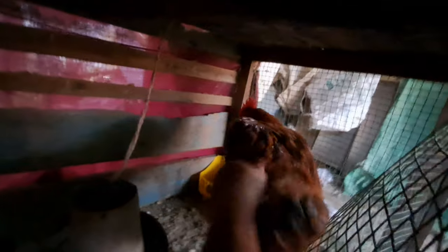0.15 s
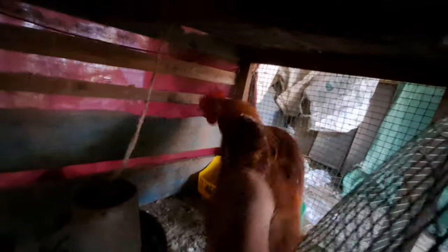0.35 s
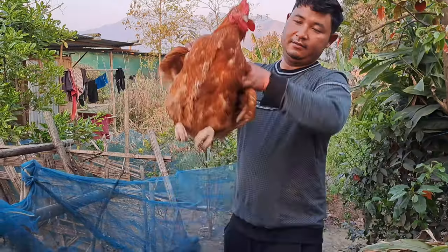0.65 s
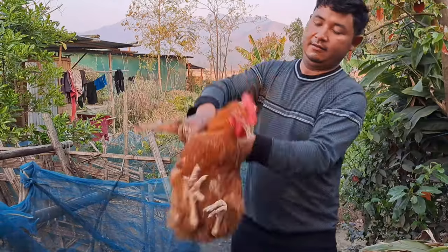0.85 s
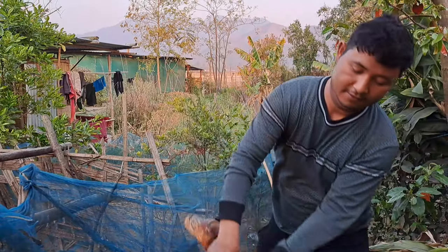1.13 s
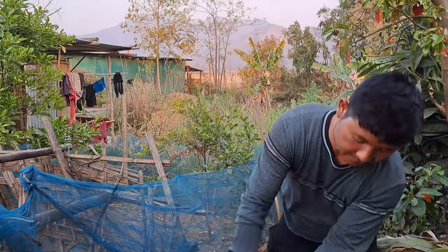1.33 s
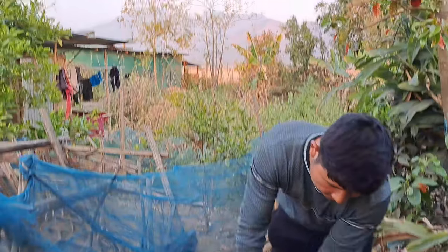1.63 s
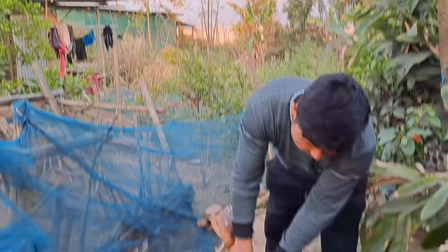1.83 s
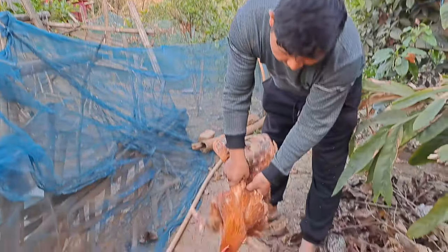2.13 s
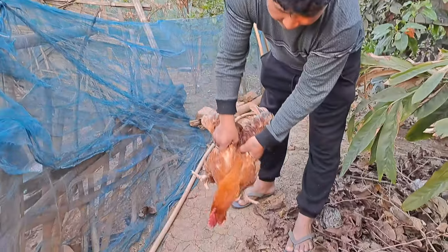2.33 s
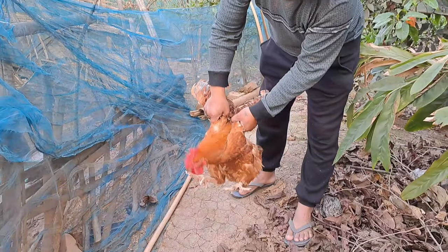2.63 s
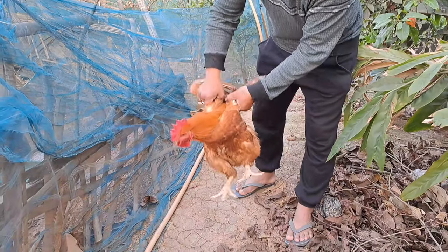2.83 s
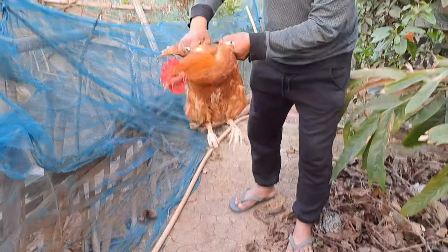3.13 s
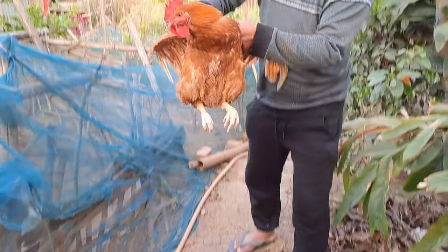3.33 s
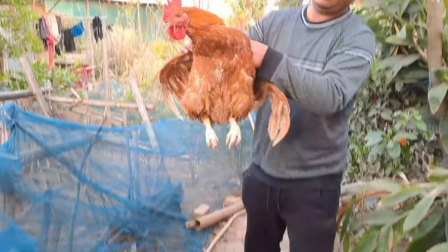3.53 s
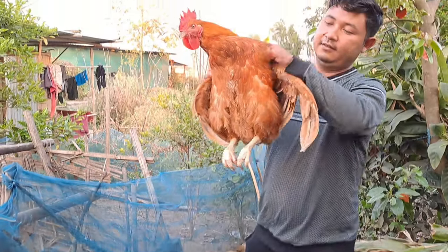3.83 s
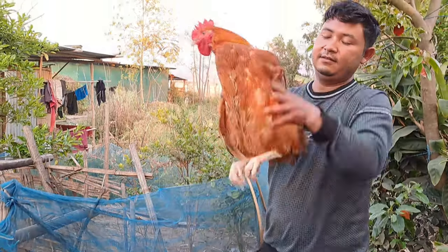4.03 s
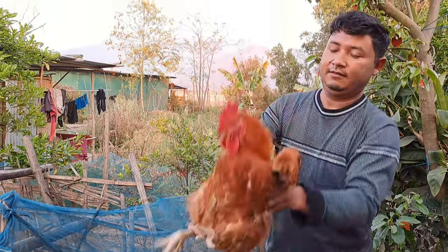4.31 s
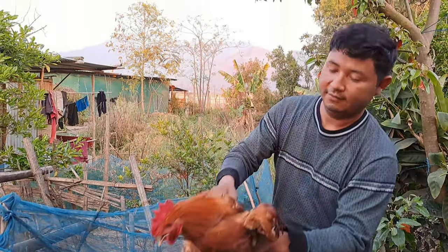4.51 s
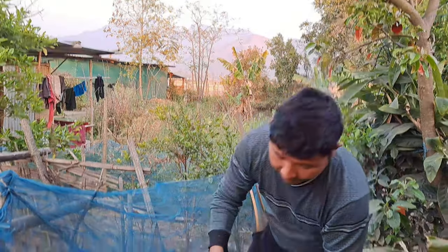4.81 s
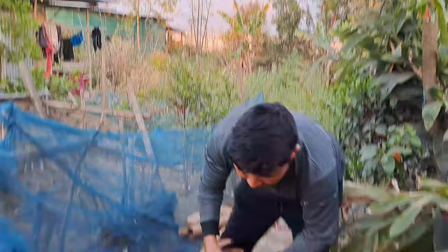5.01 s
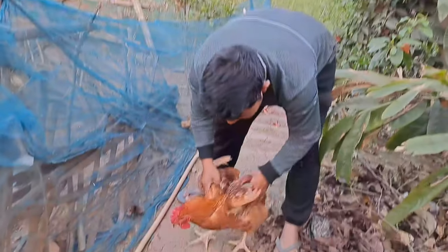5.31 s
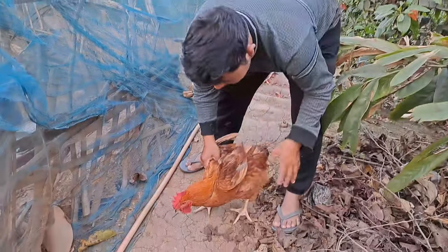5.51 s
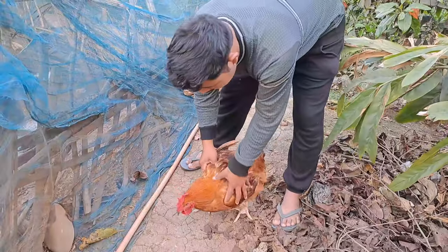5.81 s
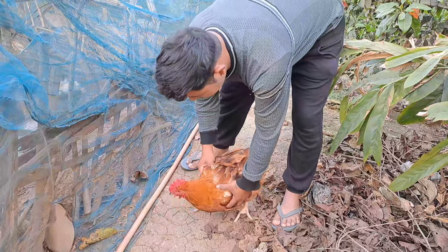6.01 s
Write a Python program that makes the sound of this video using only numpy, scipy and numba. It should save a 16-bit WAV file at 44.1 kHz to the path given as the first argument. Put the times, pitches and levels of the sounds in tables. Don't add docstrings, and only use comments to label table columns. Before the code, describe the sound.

Close stereo pickup of a frightened hen. Inside a dry wooden coop she gives rapid low clucks while feathers and straw rustle and wings thump boards. A tiny silent gap, then open garden air: a harsh raspy scream, low clucks, soft peeps, barks and loud squawks. Dry twigs crack sharply near the end, with a distant engine throbbing quietly underneath.

```python
import sys
import numpy as np
from scipy import signal
from scipy.fft import rfft, irfft
from scipy.io import wavfile
from scipy.ndimage import uniform_filter1d, minimum_filter1d, map_coordinates
from numba import njit

SR = 44100
rng = np.random.default_rng(int(sys.argv[2]) if len(sys.argv) > 2 else 0)


def gain_from_db(level_db):
    decades = np.asarray(level_db, float) / 20
    return 10 ** decades


def store_pcm(level_fs):
    pcm = np.round(np.clip(level_fs, -1, 1) * 32767).astype(np.int16)
    wavfile.write(sys.argv[1], SR, np.atleast_2d(pcm).T)


N = 271744
TIME = np.arange(N) / SR
SIDES = np.array([[1], [-1]])
# start_s, end_s
CHANGE_S = (.679, .708)


def level(x, db):
    return x * gain_from_db(db) / np.sqrt(np.mean(x ** 2))


def steady(x, span_s):
    return x / np.sqrt(uniform_filter1d(x ** 2, int(span_s * SR)) + 1e-12)


@njit
def svf(x, g, k):
    y, b, l = np.empty(len(x)), 0., 0.
    for i in range(len(x)):
        v = (b + g[i] * (x[i] - l)) / (1 + g[i] * (g[i] + k[i]))
        b, l, y[i] = 2 * v - b, l + 2 * g[i] * v, k[i] * v
    return y


def band(x, hz, width_hz, count=1):
    g = np.tan(np.pi * hz / SR) + np.zeros(N)
    k = width_hz / hz + np.zeros(N)
    for _ in range(count):
        x = svf(x, g, k)
    return x


def walk(rate_hz):
    hold = int(SR / rate_hz)
    steps = np.repeat(rng.standard_normal(N // hold + 1), hold)
    return 1.3 * uniform_filter1d(uniform_filter1d(steps, hold), hold)[:N]


def curves(tables):
    s, *columns = np.vstack(tables).T
    s = np.maximum.accumulate(s)
    gate = sum((TIME > t[0][0]) & (TIME < t[-1][0]) for t in tables)
    return uniform_filter1d(np.minimum(gate, 1.), size=200), [np.interp(TIME, s, c) for c in columns]


def air():
    # hz, density_db
    spectrum = [(82, -32), (140, -14), (192, -20), (316, -3.5), (670, -13), (977, -9), (3090, -38),
                (4240, -23), (12100, -51.5), (16000, -47)]
    # time_s, level_db
    swell = [(0, -7.5), (.7, 2), (2.5, -3.5), (4.5, -4.5), (5.6, -8.5), (6.16, -9.5)]
    log_hz, density_db = np.log(np.array(spectrum)[:, 0]), np.array(spectrum)[:, 1]
    out = 0
    for hz in 160 * 2 ** np.arange(0, 6.7, .5):
        mid, side = (band(rng.standard_normal(N), hz, hz / 3) for _ in range(2))
        db = np.interp(np.log(hz), log_hz, density_db) + 2 * walk(7.1)
        out = out + gain_from_db(db) * (mid + min(hz / 1000.0, 1) * side * SIDES)
    return level(out, -54.5) * gain_from_db(np.interp(TIME, *np.transpose(swell)))


def pump():
    # time_s, level_db
    loudness = [(0.0, -54.5), (0.45, -52), (4.01, -43), (6.16, -55.5)]
    turn = 2 * np.pi * np.cumsum(57.5 + 1.2 * walk(6)) / SR
    firing = gain_from_db(2.5 * walk(22)) * np.sin(turn)
    octave = gain_from_db(-3 + 2.5 * walk(9)) * np.sin(2 * turn)
    mid, side = (level(band(band(rng.standard_normal(N), 75, 60), 50, 80), -5) for _ in range(2))
    engine = level(firing + octave, -1.3) + mid + .7 * side * SIDES
    return engine * gain_from_db(np.interp(TIME, *np.transpose(loudness)))


def garden(x):
    t = np.arange(int(.5 * SR)) / SR
    decay = np.exp(-t / 0.0052) + gain_from_db(-27) * np.exp(-t / 0.062)
    tail = rng.standard_normal((2, len(t))) * decay * (t > .003)
    return signal.fftconvolve(x[None], gain_from_db(-25) * tail, axes=1)[:, :N]


def chirp():
    # time_s, pitch_hz, level_db
    whistle = [
        (5.601, 5300, -81),
        (5.66, 4920, -66),
        (5.76, 4900, -76),
    ]
    gate, (hz, db) = curves([np.array(whistle)])
    return gate * gain_from_db(db + 3.6 * walk(36)) * np.sin(2 * np.pi * np.cumsum(hz) / SR)


def bursts():
    # peak_s, level_db,
    # rise_20db_s, fall_20db_s, body_db
    rustles = [(.14, -62, .2, .3, 5), (.29, -60, .1, .16, 6), (.485, -49, .055, .12, 10),
               (.564, -37, .07, .036, 0), (.613, -42, .004, .07, 4), (.713, -45, .004, .35, 7.5),
               (.82, -39.5, .1, .22, 10.5), (1.03, -54, .2, .13, 4), (2.3, -72, .02, .05, 23),
               (2.19, -62, .03, .4, 1.5), (3.9, -69, 1.5, .1, 5.5), (4.064, -55.5, .05, .5, 3),
               (4.437, -56, .02, .05, 5.5), (1.62, -62, .1, .5, 5), (.472, -52, .006, .05, 14),
               (4.705, -63.5, .03, .13, 4), (4.99, -67, .05, .8, 4), (5.388, -48, .06, .065, 6),
               (5.48, -64, .03, .24, 4)]
    top, body = 0, 0
    for s, db, rise_s, fall_s, body_db in rustles:
        gain = gain_from_db(db - 20 * np.where(TIME < s, (s - TIME) / rise_s, (TIME - s) / fall_s))
        top, body = top + gain, body + gain * gain_from_db(body_db)
    return top, body


def rustle(top_gain, body_gain):
    size = gain_from_db(np.minimum(2 * rng.exponential(size=N), 5))
    grains = (rng.random(N) < .03) * rng.standard_normal(N) * size
    x = (level(grains, 2) + rng.standard_normal(N)) * gain_from_db(2 * walk(40))
    top = level(band(x, 12500, 5000), 0.3) + level(band(x, 8500, 4000), -2)
    body = level(band(x, 4600, 3200), -2.6) + level(band(x, 2200, 2030), 1.5) + level(band(x, 600, 820), -13)
    return top_gain * top + body_gain * body


def leaves():
    gains = bursts()
    shared, own = rustle(*gains), rustle(*gains)
    return 0.81 * shared + .5 * own * SIDES


def knocks(events, ring):
    out = np.zeros(N)
    for s, db, hz in events:
        start = int(s * SR)
        y = ring(hz)[:N - start]
        out[start:start + len(y)] += gain_from_db(db) * y
    return out


def snap(hz):
    t = np.arange(1800) / SR
    noise = rng.standard_normal(len(t))
    tinted = signal.lfilter(*signal.iirpeak(hz, .9, SR), noise) + 0.66 * np.diff(noise, prepend=0)
    decay = np.exp(-t / 0.0027) + .2 * np.exp(-t / .012)
    return .6 * tinted * (1 - np.exp(-t / 0.0017)) ** 2 * decay


def snaps():
    # start_s, peak_db, colour_hz
    cracks = [(1.0994, -27.5, 2560), (1.1223, -33, 3230), (1.1821, -33.5, 3124), (1.2272, -40, 4400),
              (1.2994, -40.5, 3848), (3.2932, -40.5, 4241), (4.4338, -22.5, 4042), (4.5101, -32, 2935),
              (4.7038, -21, 5830), (5.1713, -28.5, 4904), (5.3872, -11.5, 5730), (5.417, -14, 5140),
              (5.5463, -31, 5840), (5.5786, -31.5, 4690), (6.0193, -33, 7430), (1.332, -42, 2600),
              (5.129, -38, 6200), (5.312, -38, 4500), (5.724, -45, 5200), (6.112, -41, 6700),
              (.472, -19, 2000), (.477, -23, 2300), (.486, -18, 1400), (.502, -24, 3800), (.511, -26, 2200),
              (.555, -22, 1900), (.568, -25, 3500), (.613, -27, 3000), (.622, -30, 3500), (.788, -22, 3500),
              (.822, -20, 4500), (1.606, -38, 4000), (1.636, -37, 4500), (2.286, -36, 4000),
              (4.392, -38, 4360), (4.441, -28, 5000), (4.48, -42, 5000), (4.524, -38, 5500),
              (4.831, -48, 4600), (4.844, -45, 4200), (5.826, -45, 2000)]
    return knocks(cracks, snap)


def thump(hz):
    t = np.arange(4000) / SR
    rings = np.sin(2 * np.pi * hz * t) + .5 * np.sin(2 * np.pi * .45 * hz * t)
    thud = 2.3 * uniform_filter1d(rng.standard_normal(len(t)), size=60)
    return 1.74 * (rings + thud) * (1 - np.exp(-t / .002)) * np.exp(-t / 0.01)


def thumps():
    # start_s, peak_db, pitch_hz
    blows = [(0.461, -29, 239), (0.486, -23.5, 167.9), (0.518, -21, 296.5), (0.549, -26, 134.3),
             (0.637, -13, 223.4), (.5, -24, 200), (.658, -25, 200), (.672, -27, 150), (1.029, -38, 118.5),
             (1.09, -40, 122), (1.2, -41, 120), (1.52, -28.5, 72.1), (1.597, -35.5, 109.3),
             (2.788, -32, 73.3)]
    return knocks(blows, thump)


def short_calls(kind, rows):
    # peak_share_of_length, start_db, end_db, start_pitch_ratio, end_pitch_ratio
    contour = dict(coop=(.55, -14, -15, 1.08, .9), cluck=(.6, -30, -28, .9, .97),
               grumble=(.52, -15, -18, .84, .98), grunt=(.55, -15, -20, .9, 1.03),
               croak=(.45, -13, -16, .88, 1.05), peep=(.3, -15, -19, .96, 1.02),
               murmur=(.45, -14, -9, .97, .99))
    # fundamental_db, open_beak_db, brightness_db
    tint = dict(coop=(3, -24, -36), cluck=(-13, -7, -10), grumble=(-2, -10, -12), croak=(2, -9, -11),
            grunt=(-15, -16, -20), peep=(-17, -3, -5), murmur=(-8, -9, -10))
    folds = dict(coop=(.48, .36, .42, .7), cluck=(.4, .05, .08, 0), grumble=(.35, .08, .12, 0),
             grunt=(.25, .05, .08, 0), croak=(.4, .2, .38, .1), peep=(.3, .17, .3, .05),
             murmur=(.3, .22, .2, 0))
    # first_hz, second_hz, third_hz, second_vs_first_db, third_vs_first_db
    upper = dict(coop=(2400, 4240, 5800, -8, -16), cluck=(2600, 5100, 6900, -3, -13),
             grumble=(2700, 4200, 6000, -2, -7), croak=(2800, 4300, 6000, -4, -10),
             grunt=(3400, 5800, 7900, -5, -13), peep=(3450, 4150, 5400, -2, -6),
             murmur=(2600, 4200, 6000, -5, -14))
    peak, start_db, end_db, start, end = contour[kind]
    *rough, pairing = folds[kind]
    points = list(zip((0, peak, 1), (start, 1, end), (start_db, 0, end_db), rough))
    return [[(s + length_s * at, hz * ratio, db + drop_db, throat_hz, r, pairing, *tint[kind], *upper[kind])
             for at, ratio, drop_db, r in points]
            for s, length_s, db, hz, throat_hz in rows]


def long_call(rows, lock, colour, upper):
    lock_s, rasp, clean, rasp_pairing, end_pairing = lock
    s, *columns = np.transpose(rows)
    at = np.sort(np.r_[s, lock_s - .006, lock_s + .006])
    hz, db, throat_hz = (np.interp(at, s, c) for c in columns)
    locked = 1. * (at > lock_s)
    rough = np.where(locked, clean, rasp)
    pairing = rasp_pairing * (1 - locked) + end_pairing * (at >= s[-2])
    closing_db = 13 * locked * np.log2(throat_hz / throat_hz[locked > 0].max())
    low_db, beak_db, bright_db = colour
    return np.transpose([at, hz, db, throat_hz, rough, pairing, low_db + 7 * locked,
                         beak_db + closing_db, bright_db + closing_db, *(u + 0 * at for u in upper)])


def calls():
    # start_s, length_s, peak_db, pitch_hz, throat_hz
    coop = [(.046, .05, -23, 590, 650), (.092, .018, -36, 440, 480), (.186, .016, -20, 586, 640),
            (.2, .026, -28, 560, 600), (.277, .022, -21, 720, 500), (.295, .022, -14, 540, 640),
            (.312, .02, -23, 450, 800), (.328, .022, -13.5, 720, 640), (.347, .018, -23, 480, 600),
            (.431, .014, -24, 750, 750), (.443, .024, -10, 570, 760), (.468, .014, -25, 760, 760),
            (.481, .014, -18, 760, 760), (.495, .02, -22, 500, 740), (.52, .034, -15, 600, 702),
            (.558, .014, -29, 500, 520), (.634, .017, -17, 745, 742), (.652, .017, -20, 745, 742)]
    cluck = [
        (1.348, .055, -20, 487, 1100),
        (1.738, .072, -20.5, 428, 1400),
    ]
    grumble = [
        (4.911, .054, -20, 471, 965),
    ]
    grunt = [
        (5.324, .048, -19.5, 409, 820),
    ]
    croak = [
        (5.888, .064, -22.5, 415, 846),
    ]
    peep = [(1.703, .034, -45, 690, 1350), (1.88, .07, -38.5, 707, 1323), (2.515, .065, -35, 677, 1239),
            (2.74, .07, -34.5, 674, 1370), (2.99, .07, -35.5, 675, 1358)]
    murmur = [(2.66, .06, -50.5, 411, 823), (3.08, .05, -51.5, 489, 920), (3.44, .08, -40, 543, 1069),
              (3.59, .08, -45, 446, 906), (3.72, .05, -54, 488, 999), (3.8, .14, -52, 500, 953),
              (5.44, .16, -56, 342, 380), (1.105, .11, -44, 525, 1500), (2.45, .07, -54, 500, 1000),
              (5.26, .062, -52, 340, 360), (5.6, .13, -54, 430, 480), (5.85, .037, -52, 345, 360)]
    # time_s, pitch_hz, level_db, throat_hz
    scream = [(.855, 455, -33, 1500), (.89, 490, -20, 1450), (.935, 500, -14.5, 2000),
              (.985, 535, -13.5, 2200), (1.005, 520, -15, 1700), (1.04, 520, -13.5, 1580),
              (1.068, 535, -15.5, 1100), (1.1, 500, -34, 880)]
    squawks = [
        [(.122, 520, -32, 800), (.13, 560, -20, 800), (.147, 590, -21, 760), (.157, 599, -13, 673),
         (.186, 570, -25, 659)],
        [(1.435, 544, -50, 1085), (1.449, 575, -31, 1040), (1.5, 550, -23.5, 1150), (1.538, 495, -18, 1317),
         (1.587, 488, -35.5, 1270)],
        [(1.96, 382, -37, 1160), (2.01, 471, -23, 1473), (2.09, 470, -29, 1700), (2.108, 498, -22.5, 1565),
         (2.175, 380, -59, 1340)],
        [(2.19, 481, -40.5, 1022), (2.22, 594, -39, 1500), (2.255, 590, -38, 1750), (2.281, 585, -43, 1700)],
        [(2.284, 510, -40, 1200), (2.31, 503, -35, 1100), (2.36, 503, -36, 1050), (2.42, 490, -39, 1000),
         (2.445, 450, -50, 900)],
        [(3.953, 400, -30, 900), (3.962, 410, -21, 760), (3.983, 425, -17, 880), (4.0, 420, -24, 1100),
         (4.01, 410, -36, 1000)],
        [(4.044, 400, -34, 760), (4.052, 410, -21, 680), (4.062, 420, -22, 820), (4.076, 445, -17, 950),
         (4.092, 450, -34, 950)],
        [(4.19, 424, -30, 1100), (4.221, 446, -14, 1300), (4.258, 460, -19, 1220), (4.3, 468, -11.5, 1280),
         (4.34, 462, -16, 1200), (4.37, 450, -30, 1100)],
        [(4.533, 496, -32, 999), (4.553, 505, -16, 997), (4.6, 500, -19.5, 970), (4.67, 475, -12.5, 860),
         (4.7, 427, -26.5, 880)],
    ]
    # lock_s, rasp_0_1, locked_roughness_0_1, rasp_pairing_0_1, end_pairing_0_1
    locks = [(1.008, .62, .1, .3, .7), (.149, .45, .1, .2, 0), (1.492, .6, .06, 0, 0),
             (2.09, .13, .05, .3, 0), (2.205, .25, .15, 0, 0), (2.3, .4, .12, 0, 0),
             (3.985, .5, .4, .3, .3), (4.062, .5, .2, .3, 0), (4.208, .6, .1, 0, 0),
             (4.645, .19, .13, .5, 0)]
    # fundamental_db, open_beak_db, brightness_db
    colours = [(-23, -2, -3), (-1.5, -15, -24), (-13, -5, -9), (-15, -2, -5), (-12, -10, -13),
               (-22, -10, -12), (-15, -17, -17), (-19, -16, -20), (-26, -11, -13), (-17, -14, -10)]
    # first_hz, second_hz, third_hz, second_vs_first_db, third_vs_first_db
    uppers = [(3100, 5000, 6900, -5, -13), (2380, 4200, 7000, -16, -24), (3200, 5500, 7500, -3, -10),
              (3400, 5300, 6700, -2, -9), (4200, 5400, 7500, -7, -12), (2550, 4000, 5500, -11, -17),
              (2800, 5200, 7000, -4, -14), (2900, 5300, 7200, -7, -16), (3350, 6000, 7600, -5, -6),
              (2900, 5200, 6600, -3, -12)]
    kinds = dict(coop=coop, cluck=cluck, grumble=grumble, grunt=grunt, croak=croak, peep=peep, murmur=murmur)
    short = [c for kind, rows in kinds.items() for c in short_calls(kind, rows)]
    long = list(map(long_call, [scream] + squawks, locks, colours, uppers))
    return sorted(short + long, key=lambda c: c[0][0])


@njit
def fire(hz, rough, stretch, size):
    pulses, phase, p, k = np.zeros(len(hz) + 1), np.empty(len(hz)), 0., 0
    for i in range(len(hz)):
        step = hz[i] * np.exp(rough[i] ** 1.5 * stretch[k]) / SR
        p += step
        if p >= 1:
            p, k = p - 1, k + 1
            a = np.exp(rough[i] * size[k])
            pulses[i] += a * p / step
            pulses[i + 1] += a * (1 - p / step)
        phase[i] = p
    return pulses[:-1], phase


def syrinx(hz, rough, pairing):
    chance = np.clip(rng.standard_normal((N // 30, 2)).T, -2, 2)
    pulses, phase = fire(hz, rough, .3 * chance[0], .5 * chance[1])
    odd = np.cumsum(np.diff(phase, prepend=0) < 0) % 2
    puffs = level(np.exp(-phase / 0.9) * rng.standard_normal(N), 0)
    tone = level(pulses * (1 - pairing * odd) - pulses.mean(), 0)
    return (1 - .5 * rough) * tone + (.03 + .5 * rough ** 1.5) * puffs, puffs


def upper_throat(x, columns, slack, dull_db):
    centres_hz, offsets_db = columns[:3], [0, *columns[3:]]
    widths_hz = 850, 1000, 1200
    out = 0
    for k, (hz, width_hz, db) in enumerate(zip(centres_hz, widths_hz, offsets_db)):
        gain = gain_from_db(db + k * dull_db + 2.4 * walk(45))
        out = out + gain * band(x, hz * (1 - .08 * slack + .03 * walk(25)), width_hz, count=3)
    return out


def hen():
    tables = calls()
    gate, (hz, db, throat_hz, rough, pairing, low_db, beak_db, bright_db, *upper_columns) = curves(tables)
    in_coop = TIME < CHANGE_S[0]
    rows = np.vstack(tables)
    pressure = np.interp(TIME, np.maximum.accumulate(rows[:, 0]), gain_from_db(.7 * rows[:, 2]))
    db = np.log10(pressure) * 20 / .7
    slack = np.clip((-minimum_filter1d(-db, size=2600) - db) / 25, 0, 1)
    rough = np.minimum(rough + .3 * slack, .9)
    hz = hz * (1 - .055 * slack + (.006 + .05 * rough) * walk(60))
    throat_hz = throat_hz * (1 - 0.42 * slack * (TIME > CHANGE_S[0]))
    source, puffs = syrinx(hz, rough, pairing)

    low = band(source, hz, np.where(in_coop, .75, .4) * hz, count=2)
    half = band(source, hz / 2, .3 * hz, count=2)
    throat = band(source, throat_hz, np.where(in_coop, .62, .72) * throat_hz, count=4)
    beak = band(source, 2030, 1100, count=3)
    dull_db = np.clip(.9 * (db + 29.5), -16, 0)
    upper = upper_throat(source + .08 * puffs, upper_columns, slack, dull_db)
    top = band(source + 0.3 * puffs, 12000 * (1 + .03 * walk(25)), 6000, count=2)

    half_db = -17 + 20 * np.log10(pairing + .03)
    upper_db = bright_db - 12 * slack
    top_db = upper_db - 15.5 + 2 * dull_db
    layers = ((0, throat), (low_db, low), (half_db, half), (beak_db - 8 * slack, beak),
              (upper_db, upper), (top_db, top))
    voice = sum(gain_from_db(d + 1.7 * walk(70)) * steady(x, 0.018) for d, x in layers)
    return gate * gain_from_db(db + (.7 + 1.1 * rough) * walk(90)) * steady(voice, 0.045)


def scene():
    # time_s, left_minus_right_db, left_lag_samples
    place = [(0.0, 2, -4), (.7, 2, -4), (.72, 2, -5), (2.3, 1, -5), (2.5, 1, -10), (3.85, 0, -10),
             (3.95, -1, -6), (4.8, -2, -7), (6.16, 1, -6)]
    s, pan_db, lag = np.transpose(place)
    pan_db, lag = np.interp(TIME, s, pan_db), np.interp(TIME, s, lag)
    near = hen() + chirp() + snaps() + thumps()
    ears = [map_coordinates(near, [np.arange(N) - side * lag / 2], order=3) * gain_from_db(side * pan_db / 2)
            for side in (1, -1)]
    echoes = garden(near * gain_from_db(-9 * (TIME < CHANGE_S[0])))
    return np.array(ears) + echoes + leaves() + air() + pump() * gain_from_db(1.2 * SIDES)


def top_cut(x):
    return signal.sosfilt(signal.butter(12, 16650, fs=SR, output="sos"), x)


def record(dry):
    # hz, left_minus_right_db
    ports = [(100, -1.5), (500, 1), (1200, 0.5), (2400, 4), (4500, 12), (8000, 3.5), (13000, -8)]
    hz, db = np.transpose(ports)
    f = np.arange(N // 2 + 1) * SR / N + 1
    edges = 1 / (1 + (45 / f) ** 4) / (1 + (f / 15900) ** 60)
    tilt = gain_from_db(np.interp(np.log(f), np.log(hz), db) * SIDES / 2)
    x = irfft(rfft(dry) * edges * tilt, N)
    audible = uniform_filter1d(1. * ((TIME < CHANGE_S[0]) | (TIME > CHANGE_S[1])), size=150)
    return top_cut(np.tanh(1.058 * x) / 1.022 * audible)


dry = scene()
out = record(dry)
store_pcm(out)
```